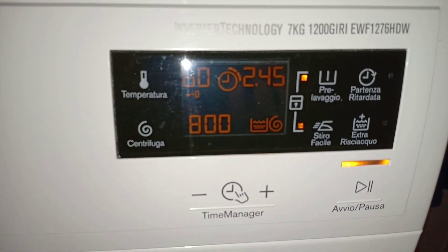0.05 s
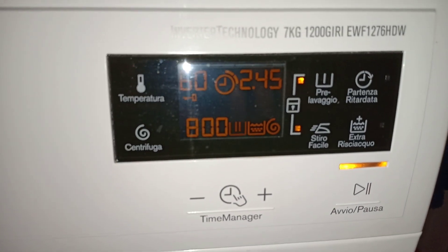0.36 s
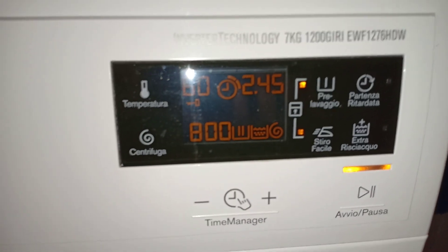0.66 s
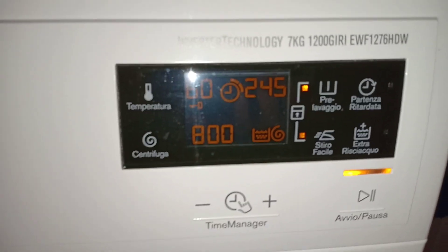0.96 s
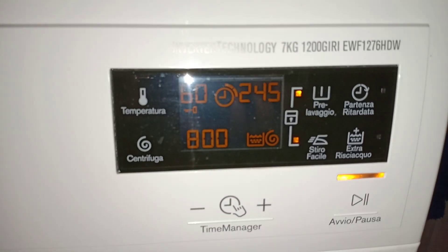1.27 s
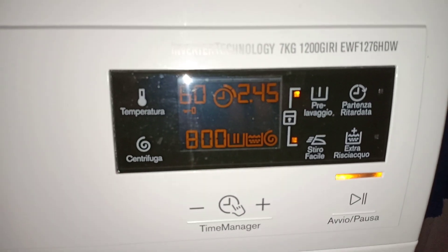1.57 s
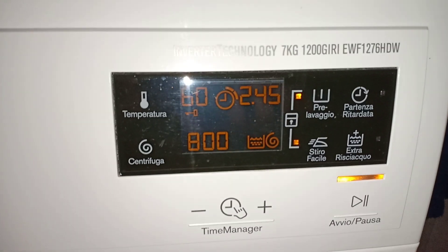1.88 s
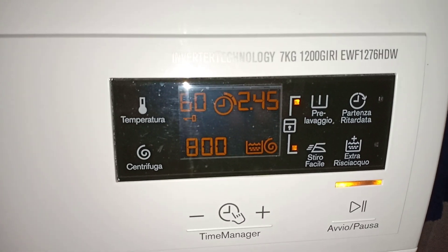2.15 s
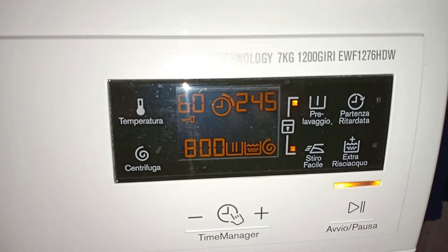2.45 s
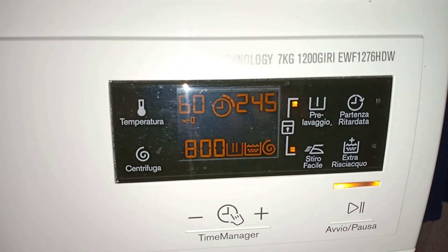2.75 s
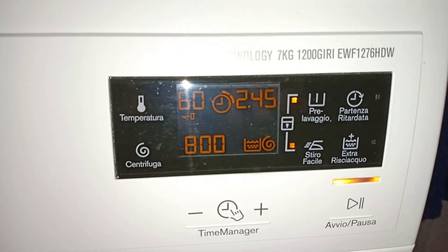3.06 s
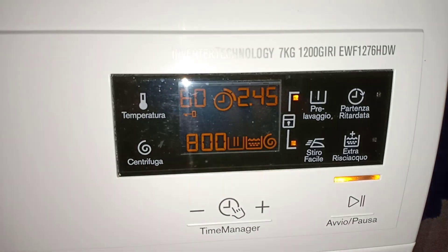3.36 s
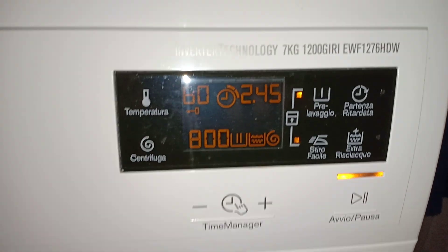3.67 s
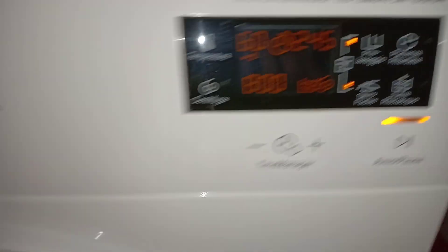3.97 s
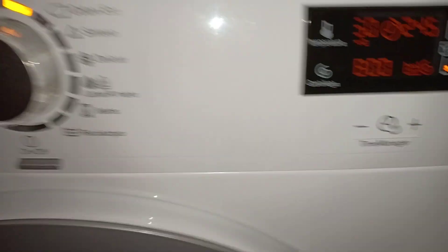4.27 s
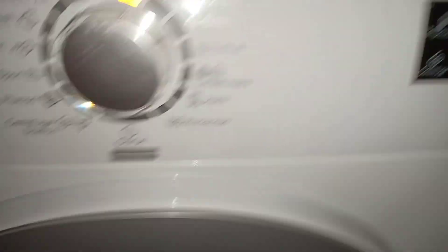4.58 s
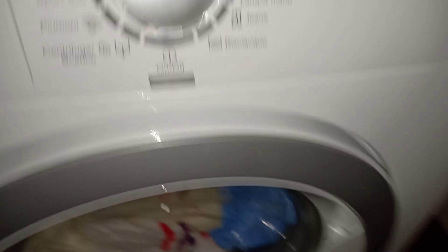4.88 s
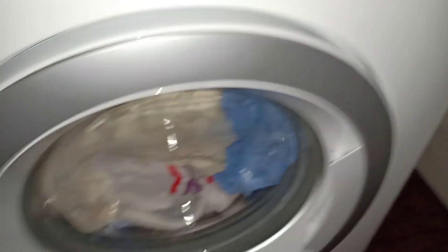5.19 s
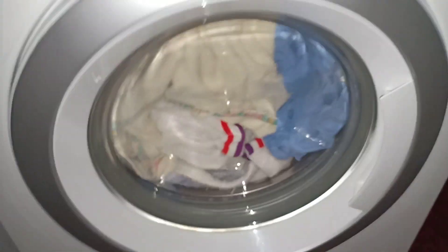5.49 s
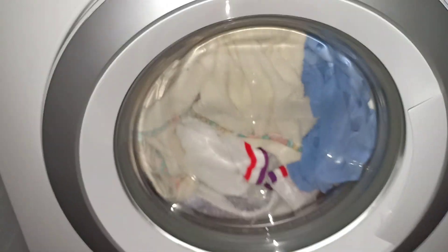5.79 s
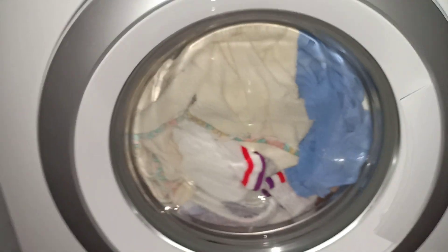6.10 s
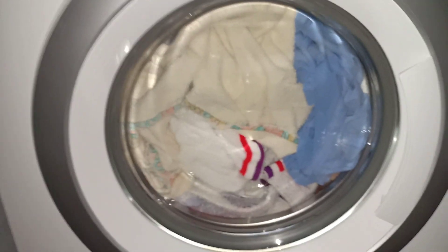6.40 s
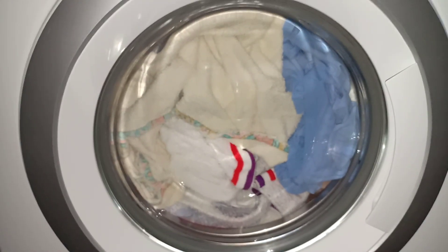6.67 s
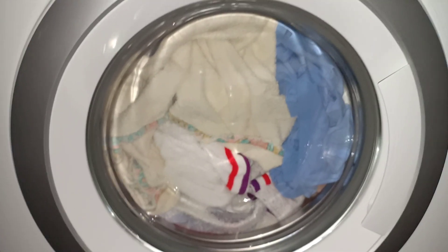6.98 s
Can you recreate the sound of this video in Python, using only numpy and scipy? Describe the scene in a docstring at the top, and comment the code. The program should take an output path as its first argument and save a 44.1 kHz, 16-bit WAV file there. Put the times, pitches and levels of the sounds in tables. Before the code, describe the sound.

At first there is only soft indoor hiss. Then a washing machine close by gets much louder as its pump kicks in with a quick run of clacks and thuds. The motor steadies into a hum while water churns in repeated surges, with low glugs alternating with fizzy splashes. A few light plastic ticks and a slight rustle sound near the microphone.

```python
"""First comes the faint hiss of a small, quiet room. At 3.6 s a washing machine's drain pump starts:
its mains motor rocks and knocks for a second, ringing the housing and cabinet, then locks to the mains
and hums. About once a second the impeller gulps a slug of water, then whips the rest into spray; the
bubbles resonate, large ones rumbling and gurgling, small ones splashing and fizzing.
A few small ticks and a faint rustle sound close by."""
import sys
import numpy as np
from scipy import signal
from scipy.fft import rfft, irfft
from scipy.io import wavfile

SR = 44100
rng = np.random.default_rng(int(sys.argv[2]) if len(sys.argv) > 2 else 0)


def wav_record(signal):
    """Record a signal, one row per channel, as 16-bit PCM in the file named by sys.argv[1]."""
    frames = np.transpose(np.atleast_2d(signal))
    bounded = np.clip(frames, -1, 1)
    # unit amplitude maps onto the largest positive 16-bit level
    quanta = np.round(bounded * 32767).astype(np.int16)
    wavfile.write(sys.argv[1], SR, quanta)


N = 314874
TIME = np.arange(N) / SR
MAINS_HZ = 50

# the impeller catches a slug of water: (time [s], relative level [dB], swell time [s])
GULPS = [(3.672, -2.5, 0.028), (3.867, -8, 0.06), (4.35, -4, 0.11), (4.668, 2.5, 0.094), (5.48, 0.4, 0.1),
         (6.392, 0.36, 0.095)]
# it whips the remaining water into spray: (time [s], relative level [dB], swell time [s])
SPRAYS = [(4.07, -6, 0.056), (4.238, -4, 0.012), (4.834, 0.8, 0.073), (5.278, -4, 0.18), (5.795, -1, 0.12),
          (6.24, -7, 0.12), (6.713, -1.8, 0.12), (7.135, -6, 0.043)]
GULP_TAIL, SPRAY_TAIL = 1.37, 1.07  # decay time over swell time


def from_db(db):
    """The decibel scale: 20 dB is a factor of ten in amplitude."""
    return 10 ** (np.asarray(db) / 20)


def unit_power(x):
    """Normalisation to a mean square of one."""
    return x / np.sqrt(np.mean(x ** 2) + 1e-20)


def at_hz(points, hz):
    """Interpolation of a spectrum on a log-frequency axis."""
    freqs, values = np.transpose(points)
    return np.interp(np.log(np.maximum(hz, 1)), np.log(freqs), values)


def colour(x, spectrum):
    """Spectral shaping, falling 24 dB per octave beyond the ends of the spectrum."""
    hz = np.arange(N // 2 + 1) * SR / N + 1e-6
    skirts = np.minimum(1, np.minimum(hz / spectrum[0][0], spectrum[-1][0] / hz)) ** 4
    return irfft(rfft(x) * from_db(at_hz(spectrum, hz)) * skirts, N)


def low_pass(x, hz, order):
    """Causal low-pass filtering, 6 dB per octave for each order."""
    return signal.sosfilt(signal.butter(order, hz, fs=SR, output="sos"), x)


def widen(pair, width):
    """Sum and difference: a middle and a filtered side signal become left and right."""
    hz = np.arange(N // 2 + 1) * SR / N
    side = irfft(rfft(pair[1]) * from_db(at_hz(width, hz)), N)
    return np.array([pair[0] + side, pair[0] - side])


def pan(left_db):
    """A level difference between the ears sets direction: the left and right gains."""
    return from_db(np.vstack([left_db, -left_db]) / 2)


def drift(rate_hz):
    """Low-passed noise gives a slow random fluctuation of unit spread."""
    step, settle = 40, 2000
    pole = np.exp(-2 * np.pi * rate_hz * step / SR)
    noise = rng.standard_normal(N // step + settle + 2)
    slow = signal.lfilter([1], [1, -2 * pole, pole * pole], noise)[settle:]
    return np.interp(np.arange(N) / step, np.arange(len(slow)), unit_power(slow))


def surges(events, tail, lag_s=0, stretch=1):
    """Incoherent addition: envelopes that swell and decay exponentially sum in power."""
    crest = 0.3  # share of the swell time over which the peak is rounded
    power = 0
    for time_s, db, swell_s in events:
        age = (TIME - time_s - lag_s) / (swell_s * stretch)
        from_peak = np.hypot(np.maximum(-age, age / tail), crest) - crest
        power = power + (from_db(db) * np.exp(-np.minimum(from_peak, 20))) ** 2
    return np.sqrt(power)


def impulses(events, column):
    """Impulsive excitation: a one-sample push per event, at the level in the given column."""
    force = np.zeros(N)
    for event in events:
        force[round(event[0] * SR)] = from_db(event[column])
    return force


def chatter(force, decay_s):
    """Contact noise: tiny impacts decay exponentially after each push, in two unrelated versions."""
    envelope = signal.lfilter([1], [1, -np.exp(-1 / (decay_s * SR))], force + 1e-18)
    return envelope * rng.choice([-1, 1], (2, N))


def resonate(x, hz, width_hz):
    """A damped resonator that passes white noise at unchanged power."""
    radius = np.exp(-np.pi * width_hz / SR)
    feedback = [1, -2 * radius * np.cos(2 * np.pi * hz / SR), radius ** 2]
    return np.sqrt((1 - radius ** 2) / 2) * signal.lfilter([1, 0, -1], feedback, x + 1e-18)


def body(force, modes):
    """Modal superposition: a struck part rings as a sum of resonances of alternating sign."""
    total = np.sqrt(sum(from_db(db) ** 2 for _, _, db in modes))
    return sum((-1) ** k * from_db(db) * resonate(force, hz, width_hz)
               for k, (hz, width_hz, db) in enumerate(modes)) / total


def room(x, t60_s, wet_db):
    """Reverberation: hard walls return the first channel as a diffuse, decaying tail in both."""
    t = TIME[:SR // 2]
    tail = rng.standard_normal((2, len(t))) * from_db(-60 * t / t60_s) * (t > 0.003)
    tail /= np.sqrt(np.sum(tail ** 2, axis=1, keepdims=True))
    wet = from_db(wet_db)
    return (x + wet * signal.fftconvolve(x[:1], tail, axes=1)[:, :N]) / np.sqrt(1 + wet ** 2)


def quiet_room():
    """Stationary broadband noise: the faint hiss and murmur of the house."""
    # background spectrum: (frequency [Hz], relative density [dB])
    spectrum = [(20, -6), (55, -0.5), (80, -0.5), (130, 2), (220, -1.5), (255, 2.5), (320, -1.5),
                (480, 0.5), (800, -2.5), (1400, -8), (2100, -4), (2600, -5), (3400, -15.5), (5200, -19),
                (8000, -24.5), (15500, -24.5)]
    # stereo width: (frequency [Hz], side over middle [dB])
    width = [(60, -2), (150, -0.38), (380, -0.38), (950, -0.5), (2380, 0), (5980, 0.3), (15000, 0.5)]
    noise = unit_power(colour(rng.standard_normal((2, N)), spectrum))
    return from_db(-66.5) * widen(noise, width)


def rustle():
    """Fast random amplitude modulation makes bright noise grainy: a faint rustle close by."""
    # rustles: (time [s], level [dB], swell time [s])
    rustles = [(4.07, -65, 0.068), (4.67, -67, 0.16), (5.29, -59.5, 0.039), (5.75, -68.5, .24),
               (6.15, -69, 0.23)]
    # their spectrum: (frequency [Hz], relative density [dB])
    spectrum = [(4000, -13), (7000, 2), (10000, -11), (12500, -5), (14000, 0), (16000, -4)]
    grains = rng.standard_normal((2, N)) * from_db(1.8 * drift(150))
    return surges(rustles, tail=0.8) * unit_power(colour(grains, spectrum))


def ticks():
    """Brief hard contacts excite a wide band: a bright snap and the heavily damped ring of plastic."""
    # contacts: (time [s], snap level [dB], ring level [dB], left over right [dB])
    contacts = [(4.4800, -56, -22.5, -19.5), (5.3144, -33, -39, -14), (5.317, -43, -26, -18),
                (6.2343, -46, -31.5, -11)]
    # modes of the plastic: (frequency [Hz], bandwidth [Hz], relative level [dB])
    plastic_modes = [(1100, 940, 0), (2800, 1600, 0), (5150, 610, -4.5)]
    snap = chatter(impulses(contacts, column=1), decay_s=0.00037)
    ring = low_pass(body(impulses(contacts, column=2), plastic_modes), 8800, order=4)
    times, _, _, left_db = np.transpose(contacts)
    direction = pan(np.interp(TIME, times, left_db))
    return room((snap + from_db(5.5) * ring) * direction, t60_s=0.12, wet_db=-21)


def spin_up_db():
    """Starting transient: the pump's drive grows exponentially, then holds steady."""
    full_drive_s, rise_db_per_s = 3.645, 407
    return np.clip(rise_db_per_s * (TIME - full_drive_s), -100, 0)


def motor_hum():
    """Forced vibration at harmonics of the mains; the load on the impeller shifts their balance."""
    # hum lines: (mains order [1], level [dB])
    harmonics = [(1, -72.5), (2, -47.5), (3, -60), (4, -60.5), (5, -54.5), (6, -61), (7, -60), (8, -60.5),
                 (9, -65.5), (10, -57), (11, -64), (12, -68), (13, -66.5), (15, -62.5), (16, -69.5),
                 (18, -66.5), (19, -73), (22, -75.5)]
    # lines that feel the load: (mains order [1], gain in a gulp [dB], gain spinning in air [dB],
    # slow steady rise or fall after the motor locks [dB/s])
    loaded_lines = [(2, 8.5, -3, 0.7), (4, 11, -4, -0.5), (5, -3, 3, 1.3), (10, -9, 7.5, 0)]
    lock_s, waver_db = 4.7, 2.3
    unlocked = TIME <= lock_s
    locked_for_s = np.maximum(TIME - lock_s, 0)
    # the motor feels each gulp and spray a little late
    load = np.minimum(surges(GULPS, GULP_TAIL, lag_s=0.03, stretch=0.75), 1)
    in_air = np.minimum(surges(SPRAYS, SPRAY_TAIL, lag_s=0.11, stretch=0.8), 1) * (1 - load)
    swing_db = {order: gulp_db * load + air_db * in_air + db_per_s * locked_for_s
                for order, gulp_db, air_db, db_per_s in loaded_lines}
    # until it locks, the motor hums more weakly and its rocking rotor smears the lines
    drive_db = spin_up_db() - 3.5 * unlocked
    angle = 2 * np.pi * MAINS_HZ * TIME + 0.098 * drift(5.1) + 0.717 * unlocked * drift(11.4)
    hum = np.zeros((2, N))
    for order, db in harmonics:
        level_db = drive_db + db + (1 - unlocked) * swing_db.get(order, 0) + waver_db * drift(3.6)
        phase = order * angle + rng.uniform(0, 2 * np.pi)
        # middle and side in quadrature give both ears the same level
        hum += np.sqrt(2) * from_db(level_db) * np.array([np.cos(phase), np.sin(phase)])
    return hum


def rotor_knocks():
    """Impacts excite modes: the rotor hits its coupling, ringing housing and cabinet; water squirts."""
    # rotor impacts: (time [s], clack level [dB], thud level [dB])
    knocks = [(3.619, -44, -40.5), (3.652, -51, -36), (3.701, -42, -39), (3.737, -46, -52),
              (3.777, -41, -37), (3.819, -39.5, -30), (3.856, -43, -44), (3.897, -38, -33),
              (3.936, -42, -39.5), (3.970, -53, -41), (4.012, -63, -43), (4.047, -43, -38.5),
              (4.110, -62, -41), (4.215, -43, -37), (4.306, -41.5, -39), (4.356, -37, -34),
              (4.396, -53, -45), (4.456, -39, -32.5), (4.496, -32.5, -33.5), (4.518, -38.5, -39.5),
              (4.592, -56, -27.5), (4.603, -34, -39), (4.625, -42, -31), (4.659, -44, -32),
              (5.114, -48.5, -34.5)]
    # resonances of pump housing, cabinet panels and squirted water:
    # (frequency [Hz], bandwidth [Hz], relative level [dB])
    housing_modes = [(895, 310, -12), (1353, 33, -8), (1800, 560, -6.5), (1930, 40, -6.5), (2250, 81, -5.5),
                     (2400, 730, -5.5)]
    cabinet_modes = [(87, 23, -2.5), (139.5, 11, 2.5), (183, 200, -22), (268, 18, -1), (340, 66, -3),
                     (483, 60, 1), (696, 110, 3), (870, 690, 1)]
    squirt_bands = [(3150, 1800, 1), (4820, 830, 4), (5970, 1100, 1.5)]
    ping_hz, rebound_s = 2185, 0.022
    force = impulses(knocks, column=1)
    clack = from_db(1) * low_pass(body(chatter(force, decay_s=0.014), housing_modes), 3100, order=3)
    # the harder the knock, the more the housing's clearest mode stands out; middle signal only
    impact = force ** 2 / force.max() * [[1], [0]]
    ping = from_db(10) * resonate(resonate(impact, ping_hz, width_hz=46), ping_hz, width_hz=450)
    # the tub answers each knock with a second, softer thud
    shove = impulses(knocks, column=2)
    shove = shove + from_db(-3) * np.roll(shove, round(rebound_s * SR))
    thud = from_db(2) * low_pass(body(chatter(shove, decay_s=0.01), cabinet_modes), 690, order=2)
    thud = signal.sosfilt(signal.butter(4, 70, "high", fs=SR, output="sos"), thud)
    # one jerk of the impeller can move only so much water
    jerk = np.minimum(force, from_db(-37.5))
    squirt = low_pass(body(chatter(jerk, decay_s=0.017), squirt_bands), 7900, order=8)
    return room(clack + ping + thud + from_db(-11.5) * squirt, t60_s=0.28, wet_db=-8)


def swelling_tones():
    """Damped oscillation: short tones swell, ring and die, rising a little in pitch."""
    # four low glugs and one brief swell of the 500 Hz hum:
    # (time [s], starting frequency [Hz], peak level [dB])
    tones = [(4.689, 299.2, -36), (5.112, 178, -41.5), (5.795, 178, -41.5), (6.405, 162.5, -36.5),
             (6.733, 503.5, -44.5)]
    swell_s, rise_per_s = 0.018, 0.49
    middle = np.zeros(N)
    for time_s, hz, db in tones:
        age = np.clip(TIME - time_s, 0, 0.5)
        envelope = age / swell_s * np.exp(1 - age / swell_s)
        middle += from_db(db) * envelope * np.sin(2 * np.pi * hz * age * (1 + rise_per_s * age / 2))
    return np.array([middle, np.zeros(N)])


def bubbles(spectrum, per_s, size_db, q, wash_db, throb, clump_db):
    """Randomly struck bubble resonators over turbulent noise, in clumps, throbbing with each turn."""
    pitches = np.geomspace(spectrum[0][0], spectrum[-1][0], num=16)
    births = np.flatnonzero(rng.random(N) < per_s / SR)
    sizes = from_db(size_db * np.minimum(rng.exponential(1, N), 4))[births]
    kicks = sizes * rng.standard_normal((2, N))[:, births]
    pitch_index = rng.integers(0, len(pitches), N)[births]
    pops = np.zeros((2, N))
    for k, hz in enumerate(pitches):
        clicks = np.zeros((2, N))
        clicks[:, births[pitch_index == k]] = kicks[:, pitch_index == k]
        pops += np.sqrt(hz) * resonate(clicks, hz, width_hz=hz / q)
    pops = unit_power(colour(pops, spectrum))
    wash = from_db(wash_db) * unit_power(colour(rng.standard_normal((2, N)), spectrum))
    impeller_turn = 1 + throb * np.cos(2 * np.pi * MAINS_HZ * TIME)
    clumps = from_db(clump_db * drift(24))
    return unit_power((pops + wash) * impeller_turn * clumps)


def churn_db(steady_db, gulp_db, spray_db, gulp_lag_s=0):
    """Steady churn, gulps and spray add in power; the level dips as the rotor stalls once."""
    stall_s, stall_width_s = 4.178, 0.023
    gulp = from_db(gulp_db) * surges(GULPS, GULP_TAIL, gulp_lag_s)
    spray = from_db(spray_db) * surges(SPRAYS, SPRAY_TAIL)
    stall_db = 8 * np.exp(-((TIME - stall_s) / stall_width_s) ** 2)
    return spin_up_db() - stall_db + 10 * np.log10(from_db(steady_db) ** 2 + gulp ** 2 + spray ** 2)


def water():
    """Larger bubbles resonate lower: the sump rumbles and gurgles, the impeller splashes and fizzes."""
    # spectra of the bubble clouds and the hollow housing: (frequency [Hz], relative density [dB])
    rumble_spectrum = [(25, -25), (68, -20), (88, 6.5), (120, 0), (148, -3), (166, 12.5), (195, 2),
                       (225, 1.5), (275, 1), (320, 1), (380, -22), (520, -12)]
    gurgle_spectrum = [(300, -12), (400, -7.5), (480, -1), (570, -1.5), (670, -2), (800, -5.5), (950, -2),
                       (1100, -8.5), (1400, -56)]
    hollow_spectrum = [(1400, -31), (1650, -15), (1900, -6), (2150, 1), (2330, -2), (2500, -4.5),
                       (2800, -8.5), (3500, -22)]
    splash_spectrum = [(850, -23), (1100, 0), (1230, -2), (1420, 1.5), (1650, 2.5), (1900, -2), (2200, 0),
                       (2750, -19.5), (3000, -18), (3800, -18.5)]
    fizz_spectrum = [(2300, 10), (3000, 2.5), (3500, -1.5), (4300, -2), (5200, 2.5), (6200, -0.5),
                     (7000, -10), (8200, -18.5), (9700, -25), (12500, -21), (14000, -19.5), (16000, -33)]
    rumble_db = churn_db(steady_db=-54, gulp_db=-42, spray_db=-48, gulp_lag_s=0.013)
    gurgle_db = churn_db(steady_db=-55.5, gulp_db=-43.5, spray_db=-52)
    splash_db = churn_db(steady_db=-56, gulp_db=-45, spray_db=-51)
    fizz_db = churn_db(steady_db=-66, gulp_db=-51, spray_db=-49.5)
    rumble = from_db(rumble_db) * bubbles(
        rumble_spectrum, per_s=980, size_db=-2, q=2.24, wash_db=-4, throb=0.067, clump_db=1)
    gurgle = from_db(gurgle_db) * bubbles(
        gurgle_spectrum, per_s=1200, size_db=-1, q=8.8, wash_db=1.8, throb=0.047, clump_db=1)
    # the housing rings hollow throughout; the broad splash swells faster and stands out in surges
    hollow = from_db(splash_db - 4.5) * bubbles(
        hollow_spectrum, per_s=1100, size_db=-4, q=12.6, wash_db=-6, throb=0.026, clump_db=3)
    surge_db = 0.46 * np.minimum(splash_db + 46, 0) - 2
    splash = from_db(splash_db + surge_db) * bubbles(
        splash_spectrum, per_s=1500, size_db=3.5, q=1.9, wash_db=8, throb=0.061, clump_db=-1.94)
    fizz = from_db(fizz_db) * bubbles(
        fizz_spectrum, per_s=5900, size_db=-0.5, q=4.9, wash_db=3.5, throb=0.038, clump_db=1)
    return room(rumble + gurgle + hollow + splash + fizz, t60_s=0.05, wet_db=-10)


def scene():
    """Superposition: the pump, slightly to the right, adds to its hum, the small sounds and the room."""
    # stereo width of the pump: (frequency [Hz], side over middle [dB])
    pump_width = [(60, -23), (120, -17.5), (240, -13), (480, -9.5), (950, 0), (1890, -1.5), (3770, 0),
                  (7520, 0), (15000, -0.5)]
    pump = widen(water() + swelling_tones() + rotor_knocks(), pump_width) * pan(-1.15)
    motor = widen(motor_hum(), pump_width) * pan(0.55)
    return pump + motor + ticks() + rustle() * pan(-1) + quiet_room()


def record(dry):
    """Band limiting cuts the top steeply; the microphone adds a small steady offset."""
    cutoff_hz, offset = 15700, 0.0011
    return signal.sosfilt(signal.ellip(10, 0.2, 70, cutoff_hz, fs=SR, output="sos"), dry) + offset


dry = scene()
out = record(dry)
wav_record(out)
```